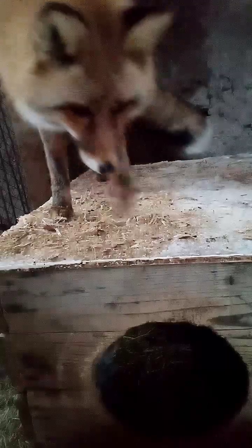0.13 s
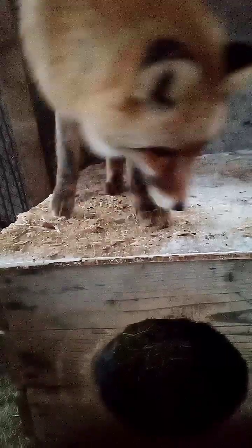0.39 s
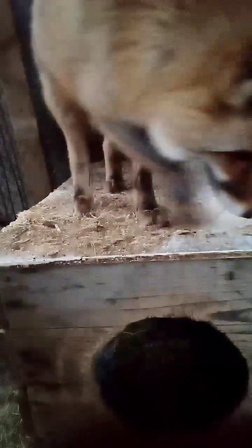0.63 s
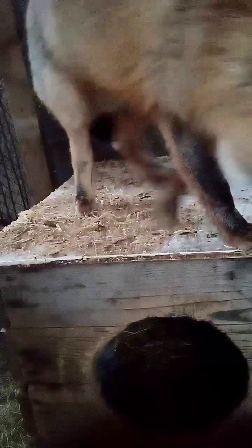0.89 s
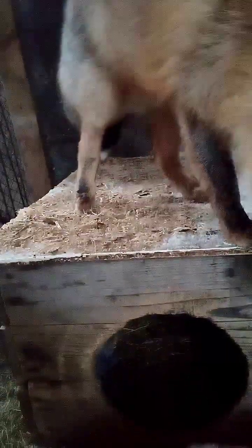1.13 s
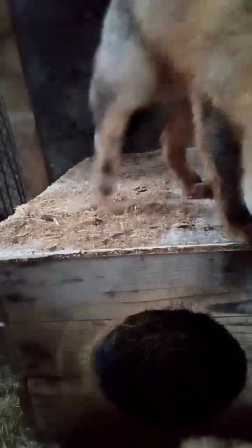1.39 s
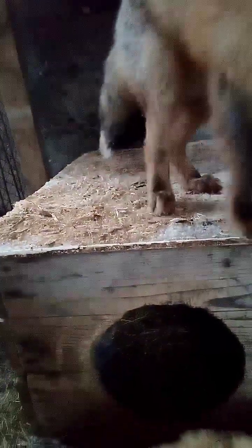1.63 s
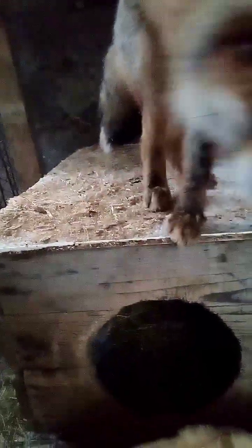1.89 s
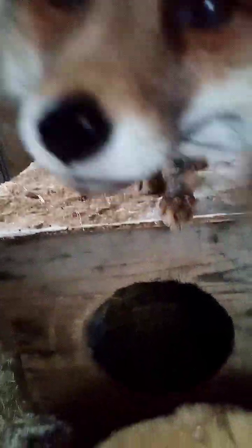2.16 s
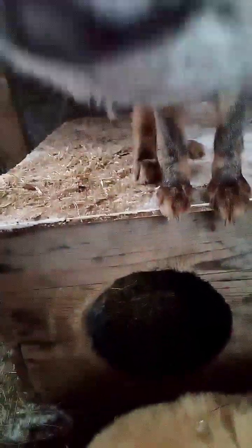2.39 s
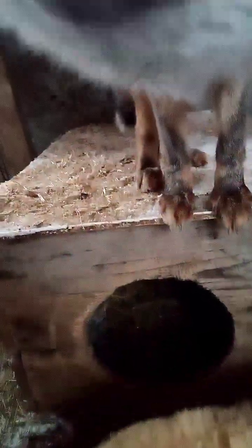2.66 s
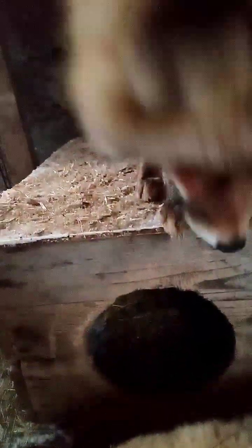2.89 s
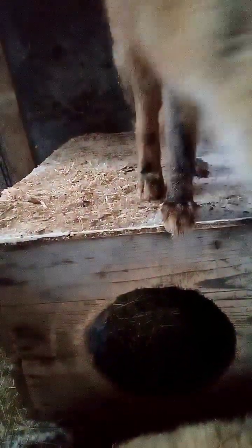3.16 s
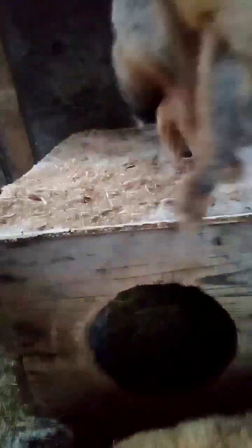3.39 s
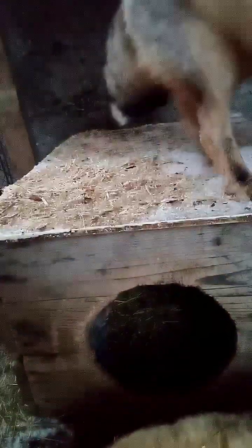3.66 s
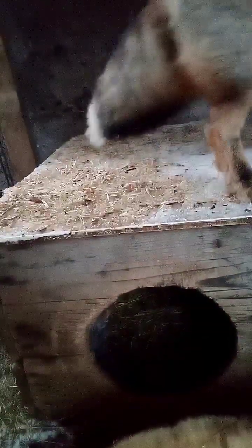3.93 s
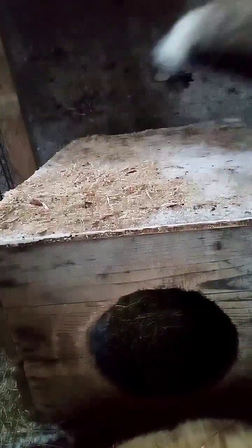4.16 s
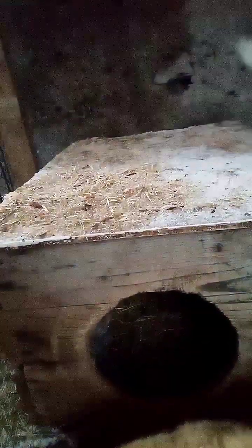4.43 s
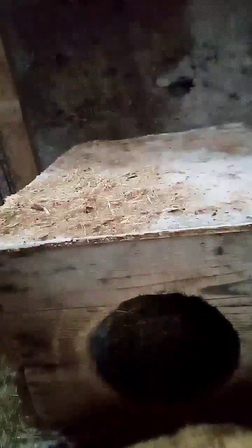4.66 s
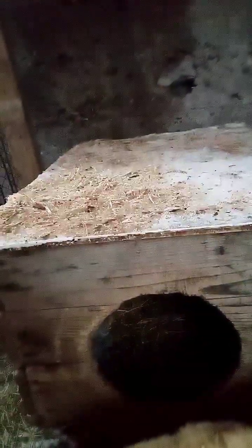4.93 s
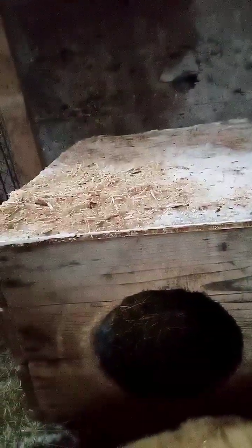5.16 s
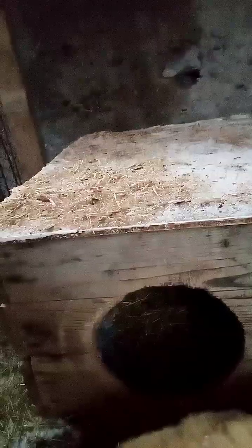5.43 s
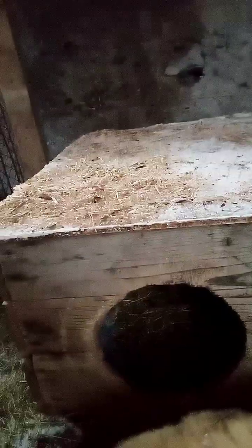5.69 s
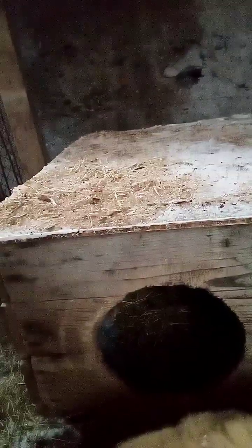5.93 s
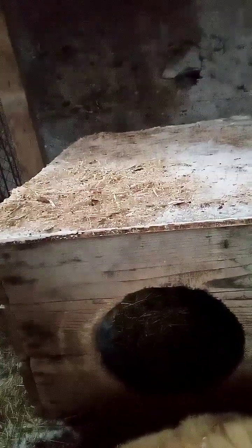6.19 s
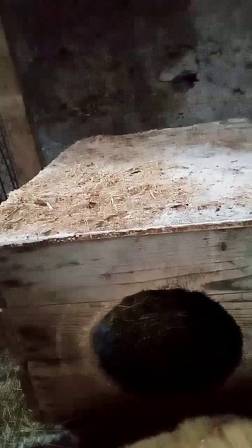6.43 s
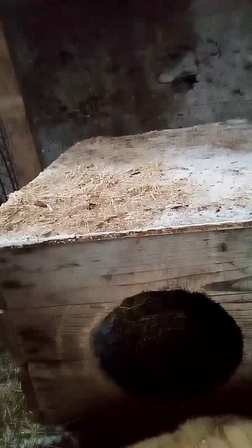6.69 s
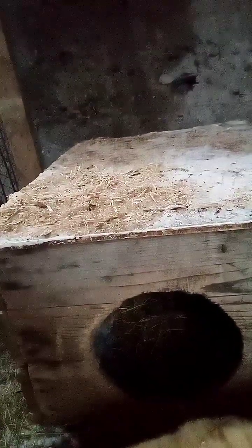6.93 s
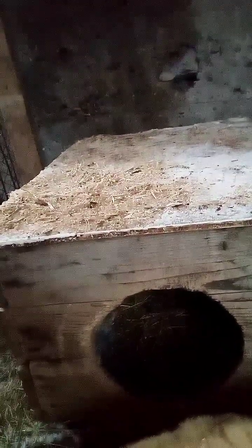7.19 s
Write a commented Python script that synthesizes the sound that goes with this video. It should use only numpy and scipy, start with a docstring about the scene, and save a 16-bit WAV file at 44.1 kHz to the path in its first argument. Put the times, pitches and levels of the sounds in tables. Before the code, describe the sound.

Close and quiet in an animal pen: soft paws thud on a hollow wooden box with light, dry straw rustles. Around two seconds a muzzle and fur brush the casing beside the right microphone, with one very loud hard knock and smaller ticks. Paws then push off with low booms and a crisp straw swish. Afterwards only soft hiss remains, with a few handling scuffs at right.

```python
"""A fox pads about on a straw-strewn wooden box in a quiet pen, close to a hand-held camera.
Paws thud on the hollow box (noise through its modes) and rustle the straw (coloured clicks); muzzle, fur
and fingers tick and scuff on the casing by the right microphone (pushes and clicks through casing modes).
Shaped noise makes the hiss, with a faint steady whine. The level dips just before and during loud
contacts, then returns quickly."""
import sys
import numpy as np
from scipy import signal
from scipy.io import wavfile
from scipy.ndimage import uniform_filter1d, minimum_filter1d

SR = 44100
rng = np.random.default_rng(int(sys.argv[2]) if len(sys.argv) > 2 else 0)


def file_out(sig):
    """Save sig as 16-bit WAV at sys.argv[1]."""
    # one column per channel
    cols = np.atleast_2d(sig).T
    # limit, then scale
    lim = np.clip(cols, -1, 1)
    pcm = np.round(lim * 32767).astype(np.int16)
    wavfile.write(sys.argv[1], SR, pcm)


def makeup_ratio(level_db):
    """Linear amplitude ratio for a level in decibels (20 dB per factor of ten)."""
    decades = np.asarray(level_db, float) / 20
    return 10 ** decades


N = 322944

# Camera casing resonances. Each row: nominal pitch in Hz, width in Hz before damping, relative level in dB.
CASING_MODES = [(176.5, 94, -2.5), (239, 80, 0.5), (316, 76, 2), (427, 32, -6), (579, 86, -6.5),
                (742.3, 94, 1), (900, 128, -2.5), (1058, 84, -9.5), (1243, 108, -4), (1470, 103, -4.5),
                (1735, 205, -7), (2105, 260, -11), (2200, 590, -11), (2970, 820, -12.5), (4110, 600, -11),
                (4500, 480, -28), (5800, 280, -27)]


def evened(x):
    """Scales to rms 1."""
    return x / np.sqrt(np.mean(x ** 2) + 1e-20)


def read(points, hz):
    """Reads a spectrum on a log-frequency axis."""
    f, value = np.transpose(points)
    return np.interp(np.log(hz + 1), np.log(f + 1), value)


def add(mix, start_s, sound, pan_db):
    """Mixes a sound in; pan_db is left minus right, and the louder side keeps its level."""
    part = mix[:, round(start_s * SR):][:, :sound.shape[-1]]
    sides = makeup_ratio(np.array([[min(pan_db, 0)], [min(-pan_db, 0)]]))
    part += (sound * sides)[:, :part.shape[1]]


def grains(shape, per_s, spread_db):
    """Random clicks of either sign; a few are large."""
    size = makeup_ratio(spread_db * np.minimum(rng.exponential(1, shape), 4)) * rng.standard_normal(shape)
    return size * (rng.random(shape) < per_s / SR)


def ring(x, modes, drive_db, damping=0.88):
    """Parallel two-pass resonators; pitches shift a little from one contact point to the next."""
    detune = .03
    out = np.zeros(x.shape)
    for (hz, width_hz, db), shift in zip(modes, rng.uniform(-1.8, 1, len(modes))):
        r = np.exp(-np.pi * width_hz * damping / SR)
        zeros = [1 - r, 0, r - 1]
        pole = [1, -2 * r * np.cos(2 * np.pi * hz * (1 + detune * shift) / SR), r * r]
        once = signal.lfilter(zeros, pole, x)
        twice = signal.lfilter(zeros, pole, once)
        out += makeup_ratio(db + drive_db(hz)) * twice * np.sqrt(2 / (1 - r))  # evens out the mode widths
    return out


def near(contact_hz, octaves):
    """A contact excites best the modes near its own pitch."""
    return lambda hz: max(-6 * (np.log2(hz / contact_hz) / octaves) ** 2, -40.)


def stroke(rise_s, t60_s):
    """Quick swell, exponential fade."""
    t, rise_s = np.arange(SR // 2) / SR, max(rise_s, .002)
    fade = makeup_ratio(-60 * np.maximum(t - rise_s, 0) / max(t60_s, .03))
    return np.minimum(t / rise_s, 1) ** 2 * fade


def hiss():
    """Microphone hiss and distant outdoor air as shaped noise, lumpier in the bass; a steady electrical whine."""
    # Spectrum of hiss and air. Each row: frequency in Hz, relative level in dB per Hz.
    air_colour = [(25, -17), (45, -51), (65, 3.5), (120, -1), (250, -5), (700, -8), (1100, -13),
                  (2000, -14.5), (5800, -17.5), (6900, -28.5), (10000, -31), (13700, -37), (14500, -24),
                  (15700, -22.5)]
    # Left-right likeness. Each row: frequency in Hz, correlation from 0 to 1.
    air_likeness = [(60, 0.085), (600, 0.18), (1500, 0.0051)]
    air_rms_db = -59.5 + 20 * np.log10(np.sqrt(2))
    whine_hz, whine_rms_db = 7818, -93

    frames, hz = N // 256 + 5, np.fft.rfftfreq(1024, 1 / SR)
    a, b, c, d, patches = rng.standard_normal((frames, 513, 5)).T
    patches = evened(uniform_filter1d(uniform_filter1d(patches, 8, 0), 14, 1))
    same = np.clip(read(air_likeness, hz), -1, 1)[:, None]
    left = a + 1j * b
    right = same * left + np.sqrt(1 - same ** 2) * (c + 1j * d)
    lumpy_db = read([(100, 1.5), (1000, 1.), (6000, .8)], hz)[:, None]  # (Hz, patch depth in dB)
    z = np.array([left, right]) * makeup_ratio(read(air_colour, hz)[:, None] + lumpy_db * patches)
    air = evened(signal.istft(z, nperseg=1024, noverlap=768)[1][:, :N]) * makeup_ratio(air_rms_db)
    whine = makeup_ratio(whine_rms_db) * np.sqrt(2) * np.sin(2 * np.pi * whine_hz * np.arange(N) / SR)
    return air + whine


def straw():
    """Dense snaps of stalks, coloured frame by frame around the brightest band of each rustle."""
    # Rustles. Each row: time of the peak in s, relative level in dB, brightest band in Hz,
    # swell in s over 20 dB, fade in s over 20 dB.
    rustles = [(0.095, -51, 3300, .017, .12), (.238, -57, 4500, 0.028, 0.17), (.612, -58, 4530, 0.1, 0.072),
               (.8, -53.5, 4900, 0.11, 0.11), (.942, -48, 4130, 0.013, .035),
               (1.036, -55.5, 4500, .01, .14), (1.542, -60, 4230, 0.21, .036),
               (1.638, -50.5, 4850, 0.018, 0.067), (1.82, -55.5, 4630, 0.031, 0.026),
               (1.93, -59.5, 4650, 0.19, 0.07), (2.226, -53.5, 4500, .015, 0.055),
               (3.231, -52, 3750, 0.027, .11), (3.522, -47.5, 5400, .012, 0.13),
               (3.612, -53.5, 4300, 0.028, 0.26), (3.834, -57.5, 5050, 0.034, 0.083),
               (3.901, -48, 3620, 0.017, 0.076), (4.135, -39, 5500, 0.044, 0.072),
               (4.384, -61.5, 4570, 0.071, 0.16), (4.534, -54.5, 4940, 0.062, .1),
               (4.594, -50.5, 4980, .12, .11), (5.164, -53.5, 5440, .02, 0.074),
               (6.348, -56, 4100, .08, 0.1)]
    # Spectrum of straw. Each row: frequency in Hz, relative level in dB per Hz.
    straw_colour = [(900, -20), (2000, 0.5), (3500, -6), (6000, -2.5), (6900, -16), (9000, -16),
                    (12500, -19.5), (13800, -26), (14600, -10), (15700, -16)]
    # Harder rustles reach higher. Each row: rustle level in dB, greatest cut above the brightest band in dB.
    skirt = [(-51, 8.5), (-37, 0)]

    hz, t, z = signal.stft(grains((2, N), 5000, 0.67), SR, nperseg=512)
    hz = hz[:, None]
    peak_s, peak_db, bright_hz, swell_s, fade_s = np.transpose(rustles)[:, :, None]
    rustle_db = peak_db - 20 * np.maximum((peak_s - t) / swell_s, (t - peak_s) / fade_s)
    envelope = np.sqrt((makeup_ratio(rustle_db) ** 2).sum(0))
    bright = bright_hz[rustle_db.argmax(0), 0]  # the loudest rustle sets the band
    above_db = np.interp(rustle_db.max(0), *np.transpose(skirt))
    skirt_db = np.where(hz > bright, above_db, skirt[0][1])
    cut_db = np.minimum(9 * np.log2((hz + 1) / bright) ** 2, skirt_db)
    colour = makeup_ratio(read(straw_colour, hz) - cut_db)
    colour /= np.sqrt((colour ** 2).mean(0) * (abs(z) ** 2).mean() * 480)
    # bundles of stalks ring briefly in narrow bands
    bundles = uniform_filter1d(rng.standard_normal(z.shape), size=6, axis=2)
    bundles = evened(uniform_filter1d(bundles, size=2, axis=1))
    colour = colour * makeup_ratio(3.5 * bundles)
    return signal.istft(z * colour * envelope, SR, nperseg=512)[1][:, :N]


def scuff(drive_rms_db, t60_s, hz, octaves):
    """Dense stick-slip clicks under a brushing stroke ring the casing; each side hears other clicks."""
    rise_s, rasp_hz = 0.0033, 2200
    slips = makeup_ratio(drive_rms_db) * evened(grains((2, SR // 2), 3000, 2.46))
    body = [mode for mode in CASING_MODES if mode[0] <= rasp_hz]
    rasp = [mode for mode in CASING_MODES if mode[0] > rasp_hz]
    drive_db = near(hz, max(octaves, .1))
    # the rasp comes from the first, fastest part of the stroke and dies sooner
    return (ring(slips * stroke(rise_s, t60_s), body, drive_db)
            + ring(slips * stroke(rise_s, t60_s * .55), rasp, drive_db))


def tick(peak_db, hz, t60_s):
    """Press, release half a cycle later and a small rebound, softer at lower pitch, through the damped casing."""
    t, cycle = np.arange(4000) / SR, SR / hz
    push = np.zeros(len(t))
    push[np.round(cycle * np.array([0, .5, 1.6])).astype(int)] = -.8, 1, .3
    push = np.convolve(push, np.hanning(round(0.29 * cycle) + 3))[:len(t)]
    sound = ring(push, CASING_MODES, near(hz, octaves=1.5), damping=3.5) * makeup_ratio(-60 * t / t60_s)
    return makeup_ratio(peak_db) * sound / abs(sound).max()


def casing_contacts():
    """Ticks and scuffs on the casing, far to the right, dulled by the microphone port's low-pass."""
    # Hard ticks. Each row: start in s, peak in dB ahead of the port, contact pitch in Hz, added fade t60 in s.
    tick_events = [(1.04, -37, 1450, .037), (1.773, -33.5, 324, 0.13), (1.989, -7.5, 1090, 0.029),
                   (2.005, -22, 2596, 0.041), (2.053, -25, 318, 0.085), (2.073, -23.5, 710, .045),
                   (2.138, -26, 1180, 0.018), (2.185, -28, 1470, 0.014), (2.409, 13, 1332, 0.024),
                   (2.444, -17, 900, 0.025), (2.6417, -21.5, 536, 0.046), (2.697, -19.5, 650, 0.12),
                   (2.9177, -11, 1550, .03), (3.2251, -7, 2130, 0.015), (5.332, -29, 1100, .05),
                   (5.598, -26.5, 407, .09), (5.827, -27.5, 1550, 0.037)]
    # Scuffs. Each row: start in s, rms of the clicks in dB ahead of stroke and casing,
    # fade t60 of the stroke in s (30 ms at least), contact pitch in Hz, spread in octaves.
    scuff_events = [(1.035, -40.5, .054, 1510, 0.47), (1.15, -58.5, 1, 1200, 2.1),
                    (1.622, -37, 0.11, 695, 4), (1.776, -55.5, 1, 300, 1.4), (1.96, -47, .6, 300, 2.6),
                    (2.004, -39, 0.33, 695, 3), (2.079, -37.5, 0.23, 400, 2.05),
                    (2.137, -37.5, 0.28, 300, 2.2), (2.225, -39.5, 0.54, 300, 1.37),
                    (2.226, -37.5, 0.22, 1420, 0.54), (2.336, -30.5, .11, 2480, 2.03),
                    (2.354, -34, 0.85, 300, 0.94), (2.411, -21, 0.083, 2000, 2),
                    (2.422, -29.5, 0.21, 1520, 1.55), (2.438, -32, 0.028, 500, 4),
                    (2.452, -40.5, 0.36, 300, 1), (2.456, -33, 0.24, 1330, 0.55),
                    (2.602, -48, .41, 277, .7), (2.648, -42.5, 0.27, 300, 1.57),
                    (2.92, -43, 0.087, 276, 0.99), (3.24, -47, 0.29, 280, 1.34),
                    (3.293, -48.5, 0.21, 300, 2.5), (3.947, -33, .12, 720, 0.25),
                    (3.99, -49.5, 0.7, 300, 0.62), (5.094, -45, 0.31, 395, 0.83),
                    (5.33, -32, 0.053, 1040, 0.38), (5.343, -40, 0.15, 785, 1.08),
                    (5.365, -43.5, 0.34, 336, 0.93), (5.597, -41, 0.25, 304, 1.5),
                    (5.716, -39, .12, 780, 0.23), (5.744, -38, 0.087, 290, .8),
                    (5.822, -37.5, 0.083, 300, 1.9), (5.852, -48.5, 0.51, 257, 0.77),
                    (6.468, -39, 0.072, 275, 0.34)]
    tick_pan_db, scuff_pan_db, port_cut_hz = -28, -27, 6400

    casing = np.zeros((2, N))
    for start_s, *knock in tick_events:
        add(casing, start_s, tick(*knock), tick_pan_db)
    for start_s, *brush in scuff_events:
        add(casing, start_s, scuff(*brush), scuff_pan_db)
    return signal.sosfilt(signal.butter(6, port_cut_hz, fs=SR, output="sos"), casing)


def thud(level_db, t60_s, hz, octaves):
    """A soft pad lands unevenly and settles, and the hollow box booms."""
    # Box resonances. Each row: nominal pitch in Hz, width in Hz before damping, relative level in dB.
    box_modes = [(66, 20, -6.5), (100, 42, 0), (137.5, 17, -2.5), (180, 96, 6.5), (233, 95, -2),
                 (308.6, 42, 5), (386, 86, -1.5), (500, 32, 1.5), (643, 44, 2), (800, 106, 8),
                 (1100, 34, 9), (1930, 150, -3)]
    both, each = rng.standard_normal(SR // 2), rng.standard_normal((2, SR // 2))
    landing = (both + 0.54 * each) * stroke(0.0077, t60_s)
    sound = ring(landing, box_modes, near(hz, max(octaves, .1)), damping=1.45)
    return makeup_ratio(level_db) * sound / np.sqrt(np.sum(sound ** 2) / (.1 * SR))


def paw_falls():
    """Paws land on the box, in the middle of the image."""
    # Paw falls. Each row: start in s, level in dB (energy of both sides spread over 0.1 s),
    # fade t60 of the landing in s, contact pitch in Hz, spread in octaves.
    fall_events = [(0.103, -50.5, 0.39, 68.5, 0.38), (.159, -52, .34, 180, 1.01),
                   (.224, -53, 0.072, 71.6, 0.48), (.249, -58, 0.23, 250, 0.54),
                   (.78, -58.5, 0.22, 200, 1.46), (0.847, -55, 0.12, 285, 0.35),
                   (.959, -51, 0.16, 130, 0.49), (1.037, -56.5, 0.088, 149, 1.1),
                   (1.272, -52, .2, 201, 1.1), (1.288, -47, 0.064, 197, 0.92),
                   (1.651, -50, 0.18, 102, 0.94), (1.778, -54.5, 0.28, 470, 0.22),
                   (2.041, -53.5, .12, 82.6, 0.45), (2.242, -53, 0.17, 154, .88),
                   (2.638, -42, 0.083, 99, 0.58), (2.701, -56, 0.03, 91, 0.95),
                   (3.601, -44, .19, 259, 1.13), (3.649, -53, 0.27, 404, 0.55),
                   (3.844, -45, 0.33, 66, 0.38), (3.9, -57.5, 0.43, 117, 0.55),
                   (4.116, -45.5, 0.4, 70, 0.44), (4.15, -57, .59, 800, .16),
                   (4.222, -54.5, 0.25, 282, 0.92), (6.496, -59, 0.13, 78, 0.65)]
    box = np.zeros((2, N))
    for start_s, *fall in fall_events:
        add(box, start_s, thud(*fall), 0)
    return box


def scene():
    """Hiss and straw on both sides, casing contacts on the right, paw falls in the middle."""
    return hiss() + straw() + casing_contacts() + paw_falls()


def top_cut(x):
    """Nothing passes above the cut-off."""
    return signal.sosfilt(signal.butter(12, 16610, fs=SR, output="sos"), x)


def record(dry):
    """Rumble cut; the level dips just before and during loud contacts, then returns quickly; band edge."""
    rumble_cut_hz, edge_hz = 38, 15800
    lead_s, threshold_db, fall_db_per_s = 0.017, -21.5, 6800.0
    dip_per_db = 0.437  # dB of dip per dB over the threshold

    dry = signal.sosfilt(signal.butter(2, rumble_cut_hz, "high", fs=SR, output="sos"), dry)
    lead = round(lead_s * SR)
    peak_db = 20 * np.log10(abs(dry).max(0) + 1e-9)
    coming_db = -minimum_filter1d(-peak_db, lead, origin=-(lead // 2))  # loudest peak within the lead
    fall_db = np.arange(N) * fall_db_per_s / SR
    held_db = np.maximum.accumulate(coming_db + fall_db) - fall_db
    over_db = np.maximum(held_db - threshold_db, 0)
    dipped = dry / makeup_ratio(dip_per_db * uniform_filter1d(over_db, size=40))
    edge = signal.firwin(511, edge_hz, window=("kaiser", 9), fs=SR)
    edged = signal.oaconvolve(dipped, edge[None], "same")
    return top_cut(edged)


dry = scene()
out = record(dry)
file_out(out)
```